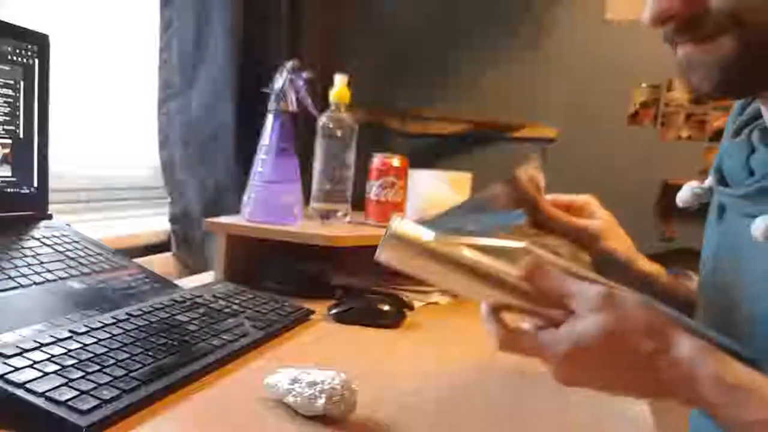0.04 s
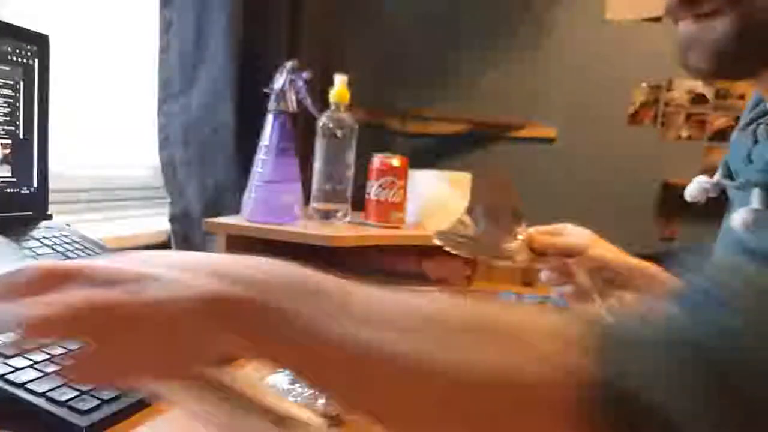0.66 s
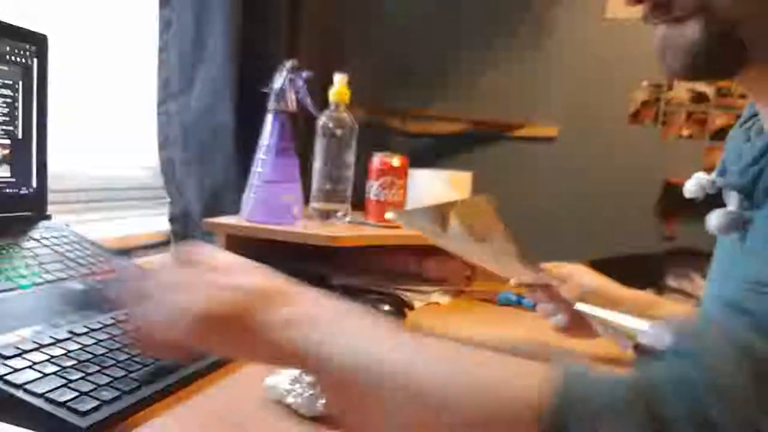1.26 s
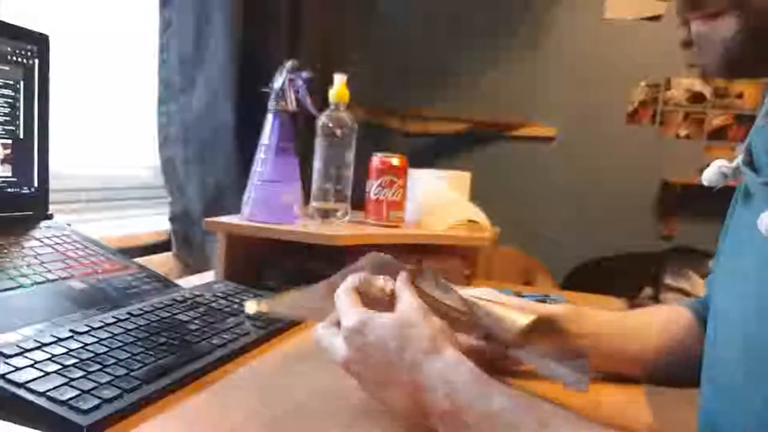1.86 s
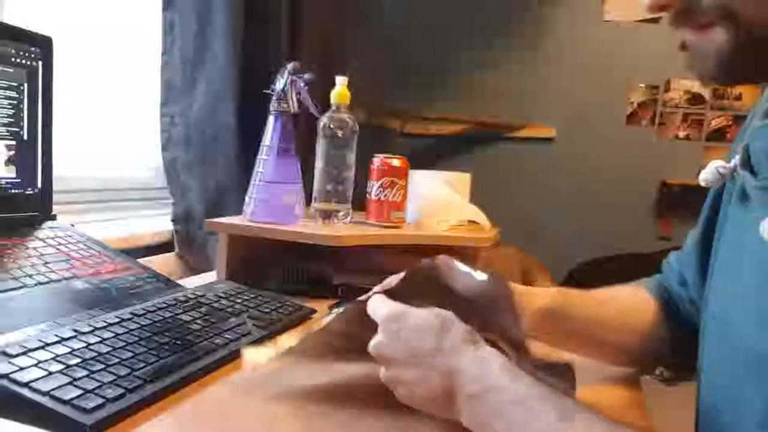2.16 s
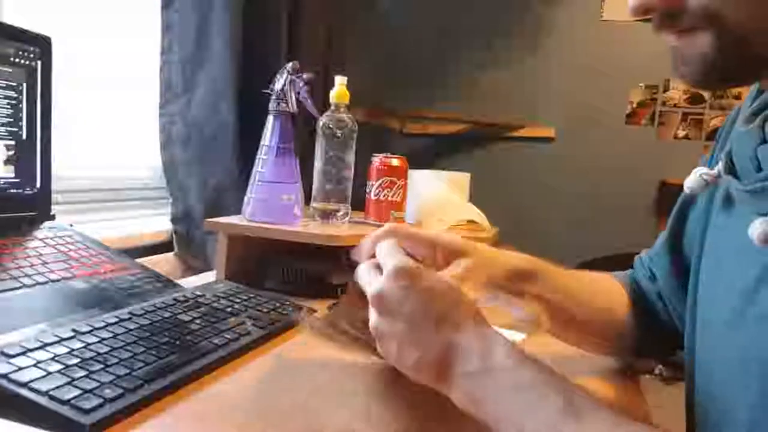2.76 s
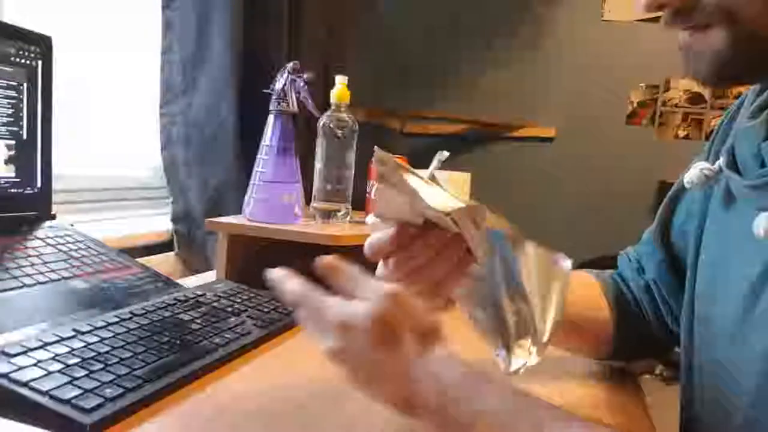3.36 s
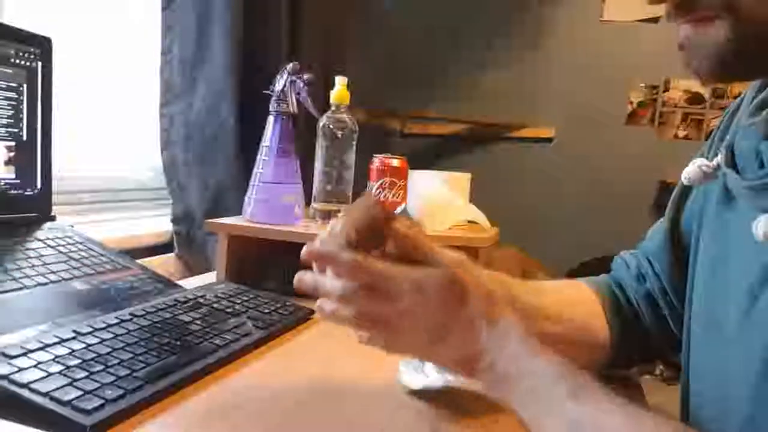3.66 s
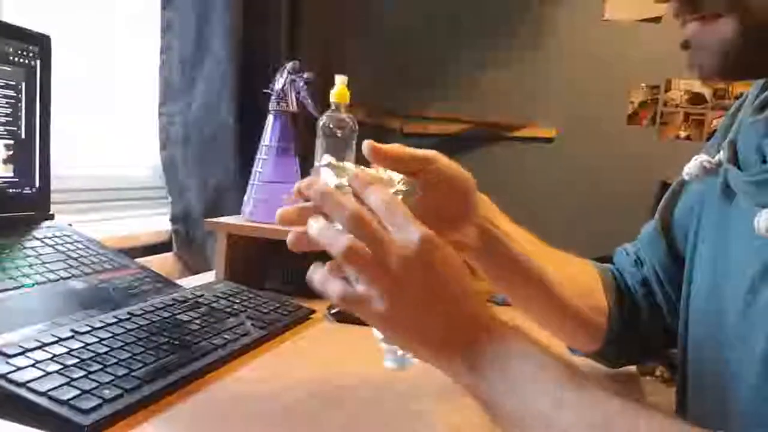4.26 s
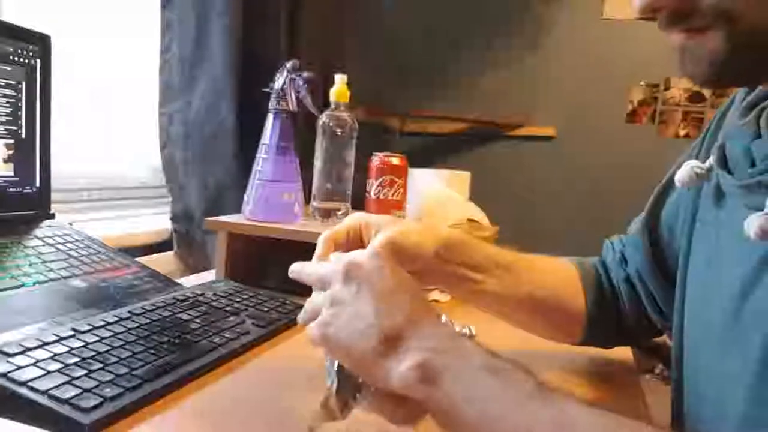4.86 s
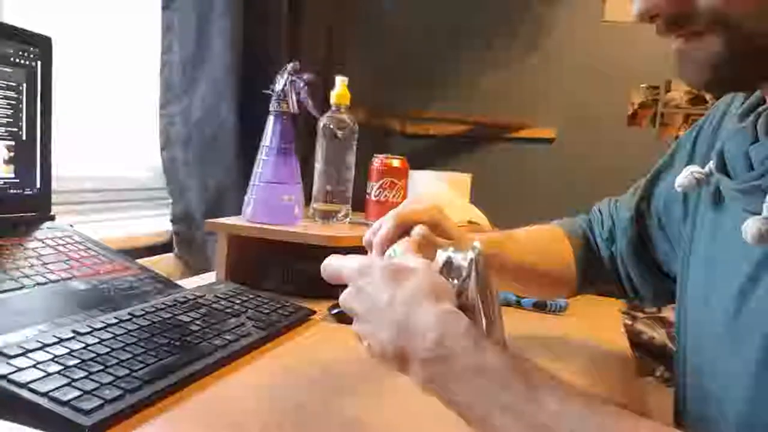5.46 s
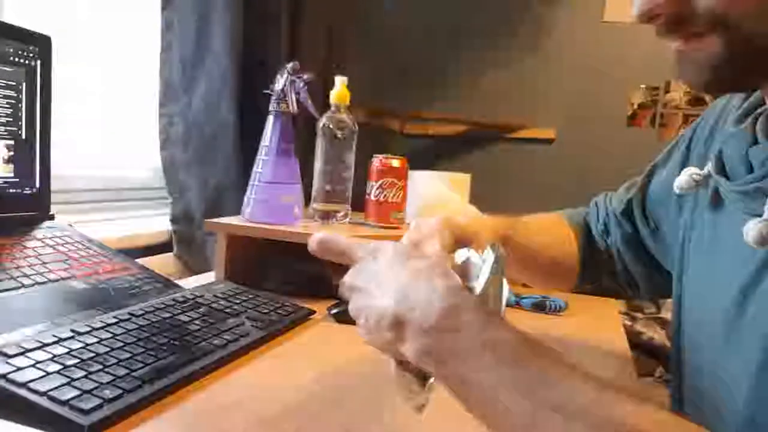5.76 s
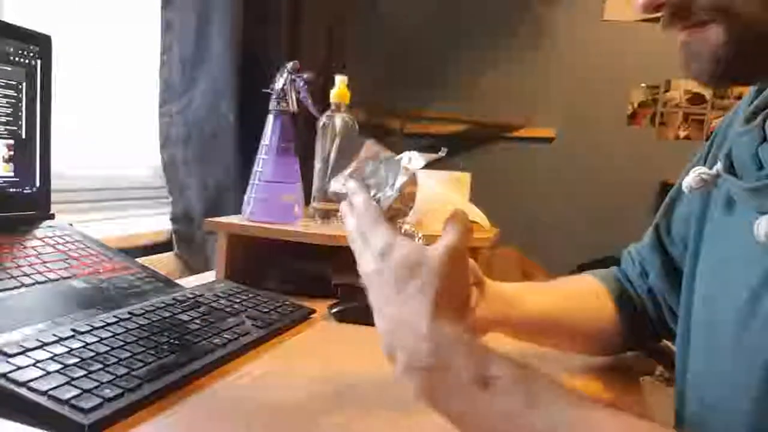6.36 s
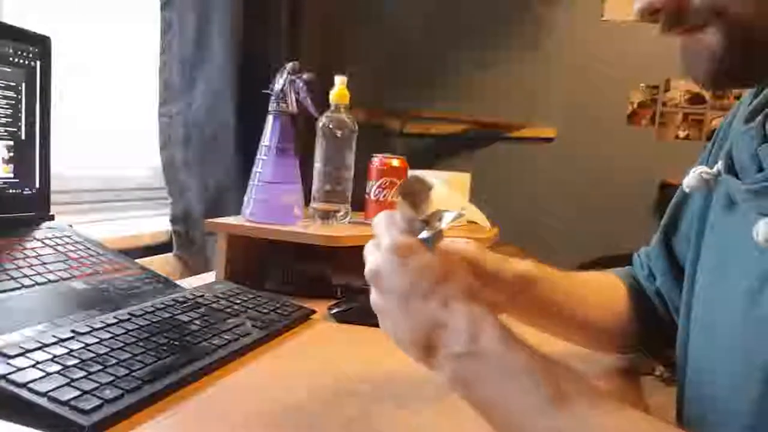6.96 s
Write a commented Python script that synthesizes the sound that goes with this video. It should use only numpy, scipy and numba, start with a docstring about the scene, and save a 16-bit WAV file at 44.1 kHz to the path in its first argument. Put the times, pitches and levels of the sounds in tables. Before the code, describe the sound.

Aluminium foil rips off a roll, the roll knocks on a desk, then hands crumple the sheet with crisp crackles.

```python
"""A sheet of aluminium foil is gripped and ripped off its roll (0.2 s). The roll is put down and the desk
knocks and rings (1-1.5 s). Two hands then crush the sheet, grip by grip, to the end (7.1 s): each buckling
crease clicks and rings a few small facets, thousands a second at first, fewer as the ball tightens.
Large creases snap, broad panels pop. Throughout, desk and small room echo into a close microphone pair."""
import sys
import numpy as np
from scipy import signal
from scipy.fft import rfft, irfft, next_fast_len
from scipy.io import wavfile
from scipy.ndimage import uniform_filter1d
from numba import njit

SR = 44100
rng = np.random.default_rng(int(sys.argv[2]) if len(sys.argv) > 2 else 0)


def store_wav(level_fs):
    """Save 16-bit WAV to argv[1]."""
    pcm = np.round(np.clip(np.atleast_2d(level_fs), -1, 1) * 32767)
    wavfile.write(sys.argv[1], SR, pcm.T.astype(np.int16))


N = 313551

# grips and swings of the sheet: (start [s], rise [s], hold [s], effort [dB], flex re effort [dB])
GRIPS = [(0, 0.0013, 0.055, -38.5, -17), (0.105, 0.027, 0.028, -39, -13.5),
         (0.402, 0.0046, 0.056, -48.0, -26), (0.527, 0.0076, 0.094, -60, -15),
         (0.67, 0.04, 0.014, -57.5, -40), (0.795, 0.011, 0.017, -52, -34), (0.851, 0.017, 0.068, -74.5, 1),
         (0.956, 0.014, 0.191, -59.0, -19), (1.313, 0.045, 0.064, -70.0, -20.5),
         (1.41, 0.027, 0.13, -56, -18.5), (1.541, 0.073, 0.14, -47.0, -41),
         (1.727, 0.0097, 0.068, -43, -30.5), (1.834, 0.0079, 0.18, -39.5, -20.5),
         (2.009, 0.004, 0.045, -33, -19.5), (2.068, 0.021, 0.12, -28.5, -18.5),
         (2.24, 0.026, 0.077, -34, -16), (2.352, 0.038, 0.29, -36.5, -19),
         (2.661, 0.067, 0.072, -31.0, -13.5), (2.811, 0.053, 0.17, -36.0, -15.5),
         (2.98, 0.076, 0.033, -32.5, -23), (3.145, 0.0038, 0.044, -42.5, -15.5),
         (3.2, 0.075, 0.026, -35.0, -15.5), (3.32, 0.005, 0.16, -36.5, -19.5),
         (3.5, 0.044, 0.042, -27.5, -15), (3.607, 0.015, 0.036, -26, -14), (3.692, 0.024, 0.16, -34.5, -14),
         (3.879, 0.012, 0.14, -36.0, -15.5), (4.034, 0.011, 0.039, -31.5, -18),
         (4.172, 0.014, 0.045, -41.5, -21), (4.238, 0.032, 0.0049, -38.0, -14.5),
         (4.316, 0.019, 0.19, -41.0, -12), (4.479, 0.016, 0.13, -41, -28), (4.66, 0.069, 0.094, -44.5, -23),
         (4.762, 0.011, 0.16, -40, -20), (4.94, 0.0058, 0.063, -40.0, -22),
         (5.008, 0.024, 0.013, -35.5, -14), (5.16, 0.02, 0.14, -48.0, -33), (5.347, 0.012, 0.17, -46, -23),
         (5.546, 0.0048, 0.01252, -43, -32), (5.646, 0.0141, 0.005, -41, -51),
         (5.748, 0.047, 0.056, -40.5, -17.5), (5.846, 0.0048, 0.081, -42.5, -12.5),
         (6.05, 0.0042, 0.063, -60, -18), (6.187, 0.049, 0.07, -61, -18.5),
         (6.315, 0.036, 0.0088, -32.5, -13.5), (6.375, 0.0096, 0.021, -42, -17),
         (6.464, 0.004, 0.073, -36.5, -16), (6.564, 0.0075, 0.19, -38.5, -26.5),
         (6.838, 0.0097, 0.11, -43, -33), (6.958, 0.015, 0.12, -40.5, -32.5)]


def foil(effort_db, flex_db, smooth_s=0.035):
    """Crackle levelled per band to follow the hands; a broader buckling area sounds deeper."""
    # colour as the sheet becomes a ball: (time [s], treble [dB], low mids [dB])
    colour = [(0.0, -1, -7.5), (0.24, 4.1, -7.5), (0.45, 4.5, -15), (0.8, 1, -17), (1.049, -0.5, -8),
              (1.38, -14, 0), (1.65, -1.5, -15), (2.1, 0.5, -12.5), (2.9, 4, -5), (3.45, -0.5, -11.5),
              (3.7, 2, -3.9), (4.2, -2.7, -2.5), (4.75, 1.5, 0), (5.05, -0.5, -2), (5.699, -8, -9.5),
              (6.15, -3, -6.5), (6.5, 0.5, -6.8), (7.1, -8.5, -10.5)]
    times_s, *columns = np.transpose(colour)
    treble_db, low_mid_db = (np.interp(np.arange(N) / SR, times_s, column) for column in columns)
    sound = near_field(crackle(effort_db), scatter_db=-1.6, scatter_t60_s=0.06)
    bands = [(2500, 9000, effort_db - 0.75), (9000, 18000, effort_db + treble_db - 2.33),
             (600, 2500, effort_db + low_mid_db - 2.92), (20, 600, flex_db - 1.6)]
    out, width = 0, int(smooth_s * SR)
    for lo_hz, hi_hz, db in bands:
        part = band(sound, lo_hz, hi_hz)
        power = uniform_filter1d(uniform_filter1d(part.mean(0) ** 2, width), width)
        out = out + part * gain_of(db) / np.sqrt(abs(power) + 1e-12)
    return out


def crackle(effort_db, creases_per_s=2100, usual_db=-40, doubling_db=13, tightening_s=7.5,
            spread_db=3.0, hollow_db=-3, reshape_octaves=0.36, bounce_db=-7, bounce_s=.0014):
    """Random buckles, many small, few large, coloured by the foil's hollow and a bounce off the desk."""
    # hollow between the hands: (time [s], resonance [Hz])
    hollow = [(2.1, 4300), (2.6, 3320), (3.45, 3390), (3.75, 2680), (4.45, 2706), (4.75, 1833), (5.4, 2802),
              (7.0, 3020)]
    t = np.arange(N) / SR
    # more force buckles more creases; a tighter ball has fewer left
    rate_per_s = creases_per_s * 2 ** ((effort_db - usual_db) / doubling_db) * np.exp(-t / tightening_s)
    at = np.flatnonzero(rng.random(N) < rate_per_s / SR)
    size = gain_of(spread_db * np.minimum(rng.exponential(1, N), 4))
    pitch_hz = rng.uniform(700, 16000, N)
    sound = creases(at, size[at], pitch_hz[at], cycles=17, facet_db=4, crack_s=0.00035)
    # each grip reshapes the hollow
    octaves = np.interp(t, [grip[0] for grip in GRIPS], reshape_octaves * rng.standard_normal(len(GRIPS)))
    hollow_hz = np.interp(t, *np.transpose(hollow)) * 2 ** octaves
    sound = sound + gain_of(hollow_db) * resonate(sound, hollow_hz, width_hz=900)
    height = np.interp(t, np.linspace(0, t[-1], 20), rng.uniform(.5, 1.5, 20))  # hands rise and sink
    delayed = np.maximum(np.arange(N) - (bounce_s * height * SR).astype(int), 0)
    return sound + gain_of(bounce_db) * sound[delayed]


def creases(at, size, pitch_hz, cycles, facet_db, crack_s, facets=6):
    """Each buckle is a sharp crack that rings one main facet and a few lesser ones."""
    chance = rng.random((len(at), facets, 3))
    hz = 300 + 16000 * chance[..., 0] ** 1.3
    hz[:, 0] = pitch_hz
    freedom = 6 ** (chance[..., 2] - .5)  # pinched by fingers or hanging free
    life_samples = freedom * cycles * SR / (hz + 2500)  # broad, low facets ring longer
    amplitude = size[:, None] * gain_of(facet_db) / np.sqrt(life_samples * (1 + np.arange(facets)))
    start = amplitude * np.exp(2j * np.pi * chance[..., 1])
    pole = np.exp(2j * np.pi * hz / SR - 1 / life_samples)
    rings = facets_ring(np.zeros(N), at, start, pole)
    crack_power = one_pole(np.bincount(at, size ** 2, N) + 1e-20, np.exp(-1 / (crack_s * SR)))
    return rings + np.sqrt(crack_power) * rng.standard_normal(N)


@njit
def facets_ring(out, at, start, pole):
    """Each facet swings from its start value and decays for six time constants."""
    out = out.copy()
    for i in range(len(at)):
        for k in range(start.shape[1]):
            swing = start[i, k]
            for n in range(at[i], min(at[i] - int(6 / np.log(abs(pole[i, k]))), len(out))):
                out[n] += swing.imag
                swing *= pole[i, k]
    return out


def handling(rip_s=.204, rip_flex_db=-16, rest_db=-92):
    """Hand effort and sheet flex [dB]: rip and grips add in power."""
    power = np.zeros((N, 2))
    for db, fall_db_per_s in [(-21, 341), (-26, 137)]:  # the rip, the freed sheet's shiver
        rip = burst(rise_s=.028, hold_s=.011, sag_db_per_s=0, fall_db_per_s=fall_db_per_s, swell=2.3)
        add(power, rip_s, np.outer(rip, gain_of([db, db + rip_flex_db])) ** 2)
    for start_s, rise_s, hold_s, db, flex_db in GRIPS:
        grip = burst(rise_s, hold_s, sag_db_per_s=17, fall_db_per_s=238)  # foil yields, then settles
        add(power, start_s, np.outer(grip, gain_of([db, db + flex_db])) ** 2)
    return 10 * np.log10(power.T + gain_of(rest_db) ** 2)


def burst(rise_s, hold_s, sag_db_per_s, fall_db_per_s, swell=1):
    """Gain of one burst: swells, sags while held, dies away."""
    t = np.arange(SR) / SR
    sag_db = sag_db_per_s * np.maximum(t - rise_s, 0)
    fall_db = fall_db_per_s * np.maximum(t - rise_s - hold_s, 0)
    return np.clip(t / rise_s, 0, 1) ** swell * gain_of(-sag_db - fall_db)


def snaps(effort_db, snap_db=16.5, follow_db=-8, follow_s=0.0051, cluster=5):
    """A large crease gives way at once and sets off a few neighbours."""
    # loudest creases: (time [s], level [dB], facet pitch [Hz])
    loudest = [(.032, -44, 8200), (.145, -40.5, 12000), (.229, -16.5, 2010), (.801, -58, 10150),
               (1.509, -51.5, 12250), (1.612, -54, 5750), (1.84, -41, 8200), (2.012, -31.5, 11800),
               (2.083, -44, 3620), (2.39, -38.5, 4670), (2.781, -25, 2878), (2.95, -30.5, 1765),
               (3.284, -26.5, 2950), (3.508, -24.5, 12660), (3.544, -40, 12110), (3.611, -20.5, 4040),
               (3.625, -18.5, 2250), (4.052, -26.5, 2698), (4.079, -46, 2506), (4.155, -31.5, 2597),
               (4.192, -31.5, 2240), (4.272, -32, 2817), (4.348, -30, 11220), (5.039, -25, 10500),
               (5.135, -42, 12320), (5.197, -34.5, 7420), (5.314, -39, 7150), (5.38, -36, 7360),
               (5.418, -35, 10540), (5.551, -39, 8134), (5.659, -53.5, 6360), (5.759, -48, 11380),
               (6.056, -55.5, 2594), (6.188, -53.5, 10380), (6.346, -24.5, 7545), (6.467, -33.5, 11960),
               (6.511, -26, 2722), (6.81, -40.5, 10290), (6.847, -44, 11800), (7.082, -37, 10830)]
    s, db, hz = np.vstack([loudest, lesser_snaps(effort_db)]).T
    chance = rng.random((len(s), cluster, 2))
    follows = np.arange(cluster) > 0
    onset_s = s[:, None] - follows * follow_s * np.log(chance[..., 0])
    at = np.clip(onset_s * SR, 0, N - 1).astype(int)
    size = gain_of(db[:, None] + snap_db + follows * follow_db)
    pitch_hz = hz[:, None] * 2 ** (follows * (chance[..., 1] - .5))
    sound = creases(at.ravel(), size.ravel(), pitch_hz.ravel(), cycles=26, facet_db=5.0, crack_s=.0007)
    return near_field(sound, scatter_db=-0.5, scatter_t60_s=.058)


def lesser_snaps(effort_db, range_db=7, count=45):
    """Random snaps as strong as the current effort: (time [s], level [dB], facet pitch [Hz])."""
    when, strength, pitch = rng.random((count, 3)).T
    at = (when * N).astype(int)
    return np.transpose([at / SR, effort_db[at] + range_db * (strength - .5), 1100 * 5 ** pitch])


def pops(pop_db=-5, t60_s=0.091, overtone_db=-6, stretch=0.53, mode_count=4):
    """A broad panel flips over and rings at its pitch and a few uneven overtones."""
    # panel flips: (time [s], level [dB], pitch [Hz])
    flips = [(.409, -53, 217), (.879, -59.5, 270), (1.876, -46, 397.7), (1.939, -42, 150.6),
             (2.469, -36, 388), (2.943, -32.5, 773), (3.502, -31, 571.7), (3.675, -20.5, 843),
             (4.099, -34, 650), (5.056, -41, 526), (5.853, -34.5, 1200)]
    t, out, k = np.arange(SR // 4) / SR, np.zeros(N), np.arange(mode_count)
    for (s, db, hz), jitter in zip(flips, rng.uniform(0.82, 1.2, (len(flips), mode_count))):
        modes = zip(hz * (1 + stretch * k * jitter), k * overtone_db, t60_s * jitter)
        add(out, s, gain_of(db + pop_db) * ring(modes, t))
    return out


def desk(tick_db=-11, tick_s=0.0045, ring_db=-21, thud_db=-14, thud_t60_s=0.07,
         bump_rise_s=0.0046, bump_t60_s=0.1, lag_s=0.00025):
    """Roll and arms knock on the desk; a softer contact gives a duller blow."""
    # blows on the desk: (time [s], level [dB], contact [ms])
    knocks = [(0.982, -28.5, 0.67), (1.023, -22, 0.79), (1.056, -1, 0.36), (1.0635, -8.5, 0.46),
              (1.085, -15, 0.53), (1.413, -30, 2), (1.447, -37.5, 0.32), (1.454, -22.5, 2.5)]
    # desk modes: (frequency [Hz], level [dB], t60 [s])
    desk_modes = [(101, -30, .18), (149, -6, 0.17), (181, -20.5, .16), (286.3, -3, 0.23), (315, 1.5, 0.18),
                  (346.6, 0.5, 0.15), (420, -0.5, 0.13), (470, -1.5, 0.12), (541, -2, 0.11),
                  (570, -7.5, 0.098), (736, -15, .09), (760, -21, .1), (794, 0, 0.12), (866, -3, .1),
                  (965, -15.5, 0.077), (1090, -10, .1), (1620, 1.5, 0.056), (1630, 3, .06),
                  (1770, 6.5, .09), (2340, 0, 0.16)]
    # roll touching down: (time [s], level [dB])
    touches = [(.965, -36.5), (1.056, -36), (1.086, -53)]
    # roll modes: (frequency [Hz], level [dB], t60 [s])
    roll_modes = [(1420, -15, 0.4), (1650, -12.5, .08), (1800, 2.5, .17), (2260, -9.5, 0.11)]
    # soft arm bumps: (time [s], level [dB], pitch [Hz])
    bumps = [(0.577, -69, 160), (5.961, -57.5, 86), (6.002, -52, 141.9), (6.075, -56.5, 255.7),
             (6.083, -46, 82.9), (6.129, -63.5, 257), (6.239, -61, 68.6)]
    t, out = np.arange(SR // 2) / SR, np.zeros(N)
    board = signal.butter(3, [220, 1000], "band", fs=SR, output="sos")  # crowded, damped modes
    for s, db, contact_ms in knocks:
        tick = gain_of(tick_db) * rng.standard_normal(len(t)) * np.exp(-t / tick_s)
        board_noise = unit_rms(signal.sosfilt(board, rng.standard_normal(len(t))))
        thud = gain_of(thud_db - 60 * t / thud_t60_s) * board_noise
        blow = gain_of(ring_db) * ring(desk_modes, t) + thud + tick
        cutoff_hz = 1000 / (3 * contact_ms)
        add(out, s, gain_of(db) * one_pole(blow, np.exp(-2 * np.pi * cutoff_hz / SR)))
    for s, db in touches:
        add(out, s, gain_of(db) * ring(roll_modes, t))
    for s, db, hz in bumps:
        add(out, s, gain_of(db) * ring([(hz, 0, bump_t60_s)], t) * 2 * (1 - np.exp(-t / bump_rise_s)))
    out = band(out, 75, 14000)  # desk radiates no deep bass
    # left microphone faces away: later, weaker
    pair = filtered(out, lambda f: np.exp(-2j * np.pi * f * lag_s * np.array([[1], [0]])))
    return pair * gain_of([[-1], [1]])


def near_field(x, scatter_db, scatter_t60_s):
    """Direct sound reaches the nearer microphone first; desk, hands and clutter add scatter."""
    # foil position: (time [s], left lag behind right [ms])
    bearing = [(.3, -0.049), (1.8, 0.053), (3.4, 0.025), (3.9, 0.074), (5.3, 0.1), (6.6, .07)]
    # foil colour: (frequency [Hz], gain [dB])
    foil_spectrum = [(35,-20.5), (70,-16), (140,-7.5), (200,-9.5), (300,-6), (450,-6.5), (620,-7.5),
                     (850,-0.5), (1600,0.5), (2700,-1.5), (7700,3.5), (9000,-2), (11000,2), (16000,1.5)]
    hz, t, spectra = signal.stft(x, SR, nperseg=256)
    off_centre = np.interp(hz, [8500, 10000], [1, 0])[:, None]  # top octave stays centred
    lag_s = np.interp(t, *np.transpose(bearing)) / 1000 * off_centre
    left = signal.istft(spectra * np.exp(-2j * np.pi * hz[:, None] * lag_s), SR, nperseg=256)[1][:N]
    scatter = echoes(x, [(1000, scatter_t60_s)], delay_s=.002, size=128)
    pair = np.array([left, x]) + gain_of(scatter_db) * scatter
    return filtered(pair, lambda f: gain_of(lookup(foil_spectrum, f)))


def room(x):
    """Reverberation of the small room."""
    # decay: (frequency [Hz], t60 [s])
    decay = [(100, 0.31), (400, 0.18), (1500, 0.062), (5000, 0.074), (10000, 0.087), (16000, 0.28)]
    return echoes(x, decay, delay_s=0.013)


def echoes(x, decay, delay_s, size=512):
    """Diffuse paths: the power of x dies away band by band, carried by stereo noise."""
    # left-right likeness of echoes: (frequency [Hz], correlation [-])
    likeness = [(100, 0.98), (500, 0.22), (1400, 0.39), (3000, 0.23), (7000, 0.12), (10000, 0.5),
                (16000, 1)]
    frames = dict(fs=SR, nperseg=size, noverlap=size * 3 // 4)
    hz, t, spectra = signal.stft(np.pad(x, (round(delay_s * SR), 0))[:N], **frames)
    fades = gain_of(-60 * t[1] / lookup(decay, hz)) ** 2
    power = np.array([one_pole(abs(row) ** 2 + 1e-24, fade) for fade, row in zip(fades, spectra)])
    noise = signal.stft(rng.standard_normal((2, N)), **frames)[2]
    same = np.clip(lookup(likeness, hz), -1, 1)[:, None]
    noise[1] = same * noise[0] + np.sqrt(1 - same ** 2) * noise[1]
    return signal.istft(noise / noise.std() * np.sqrt(power), **frames)[1][:, :N]


def hush(level_db=-76):
    """Faint steady air of the room."""
    # air noise: (frequency [Hz], relative density [dB])
    air_spectrum = [(25, -7), (60, 3), (140, 2.5), (300, -26), (800, -12.5), (1250, -8.5), (2000, -15.5),
                    (6000, -19), (16000, -22)]
    air = rng.standard_normal(N) + .5 * rng.standard_normal((2, N))
    return gain_of(level_db) * unit_rms(filtered(air, lambda f: gain_of(lookup(air_spectrum, f))))


def gain_of(db):
    return 10 ** (np.asarray(db) / 20)


def unit_rms(x):
    return x / np.sqrt(np.mean(x ** 2) + 1e-20)


def lookup(points, hz):
    """Interpolates a table on a log-frequency axis."""
    f, value = np.transpose(points)
    return np.interp(np.log(hz + 1), np.log(f + 1), value)


def add(mix, start_s, sound):
    part = mix[max(round(start_s * SR), 0):][:len(sound)]
    part += sound[:len(part)]


def filtered(x, response):
    """Applies a response given as a function of Hz."""
    size = next_fast_len(N + 4096)
    return irfft(rfft(x, size) * response(np.fft.rfftfreq(size, 1 / SR)), size)[..., :N]


def band(x, lo_hz, hi_hz):
    """Band-pass with steep skirts."""
    return filtered(x, lambda f: ((1 + (lo_hz / (f + 1)) ** 12) * (1 + (f / hi_hz) ** 12)) ** -.5)


def one_pole(x, pole):
    """Unity-gain low-pass."""
    return signal.lfilter([1 - pole], [1, -pole], x)


def resonate(x, hz, width_hz):
    """Unity-gain resonance following the curve hz."""
    turn = np.exp(2j * np.pi * np.cumsum(hz) / SR)
    return 2 * (turn * one_pole(x / turn, np.exp(-np.pi * width_hz / SR))).real


def ring(modes, t):
    """Decaying modes, struck at t = 0."""
    return sum((-1) ** k * gain_of(db - 60 * t / t60_s) * np.sin(2 * np.pi * hz * t)
               for k, (hz, db, t60_s) in enumerate(modes))


def scene(room_db=-13):
    """Foil and desk in a small room."""
    effort_db, flex_db = handling()
    sheet = (foil(effort_db, flex_db) + snaps(effort_db) + pops()) * gain_of([[-.35], [.35]])
    close = sheet + desk()
    return close + room(gain_of(room_db) * close[1]) + hush()


def record(dry, edge_hz=16100):
    """Recorder band limit."""
    lowpass = signal.firwin(401, edge_hz, window=("kaiser", 9), fs=SR)
    return signal.oaconvolve(dry, lowpass[None], "same", axes=1)


dry = scene()
out = record(dry)
store_wav(out)
```